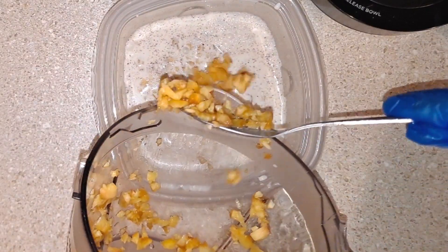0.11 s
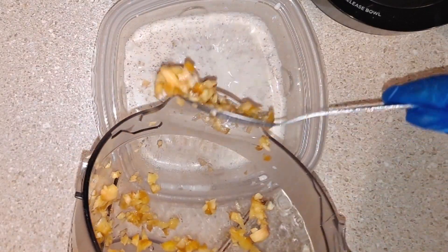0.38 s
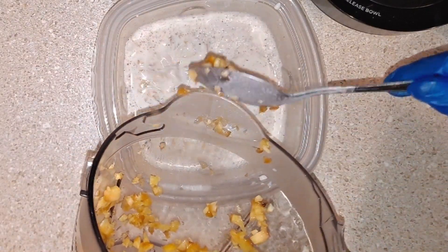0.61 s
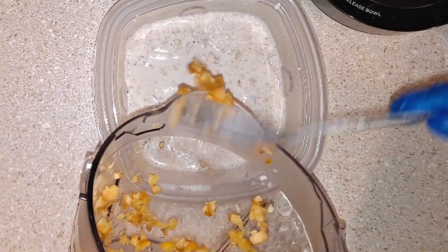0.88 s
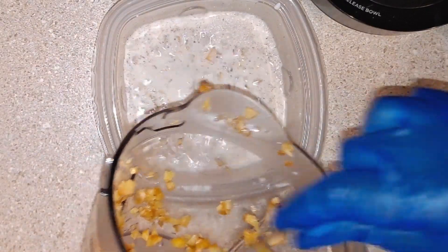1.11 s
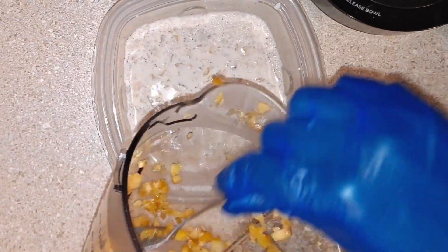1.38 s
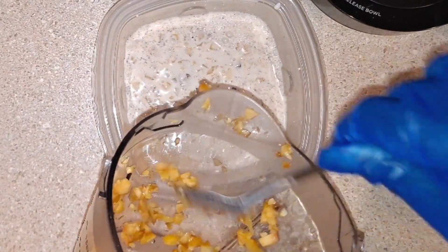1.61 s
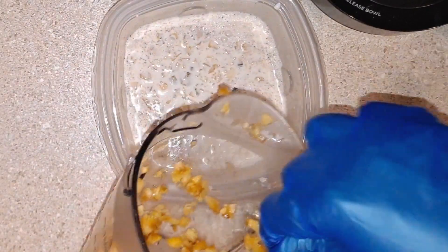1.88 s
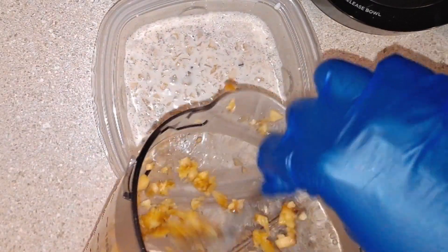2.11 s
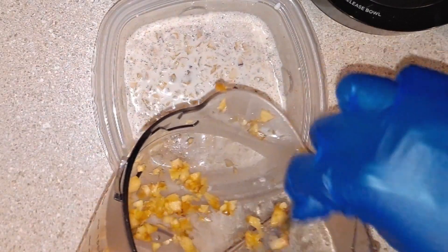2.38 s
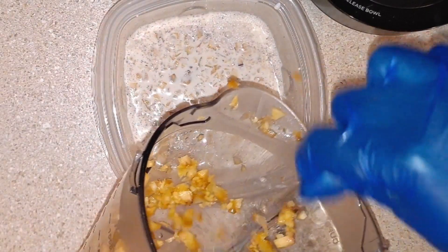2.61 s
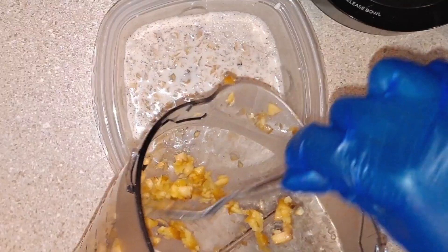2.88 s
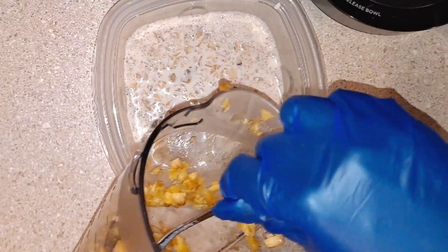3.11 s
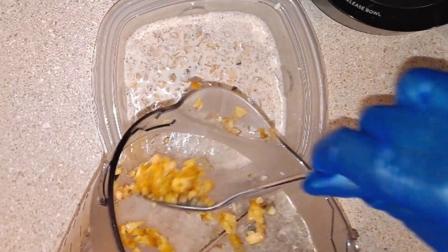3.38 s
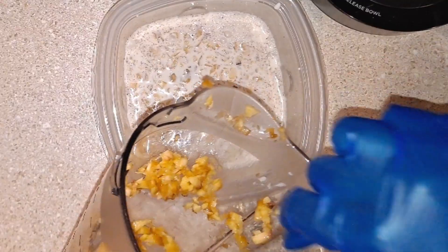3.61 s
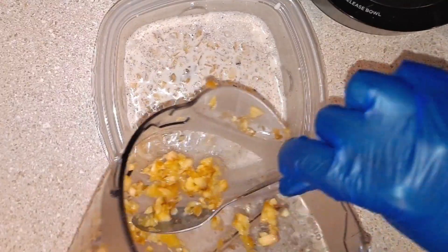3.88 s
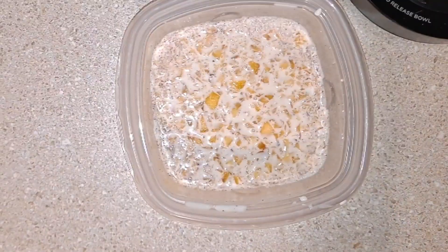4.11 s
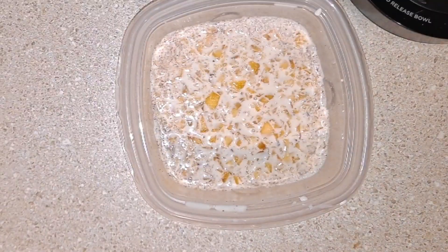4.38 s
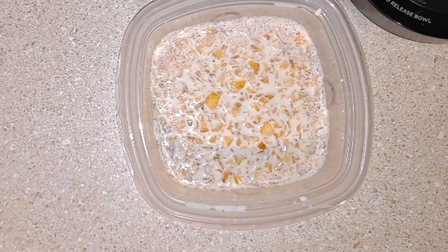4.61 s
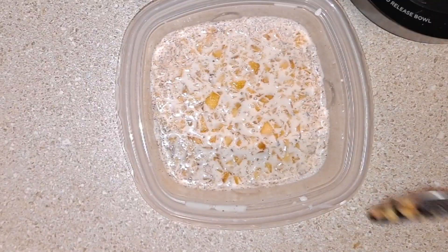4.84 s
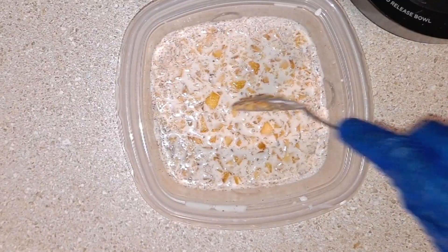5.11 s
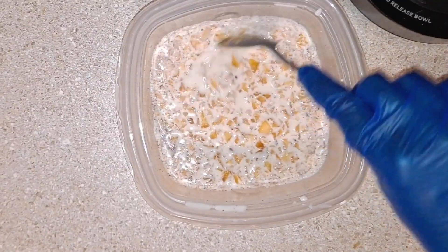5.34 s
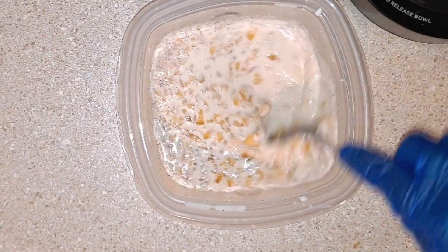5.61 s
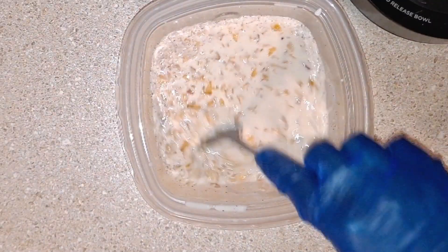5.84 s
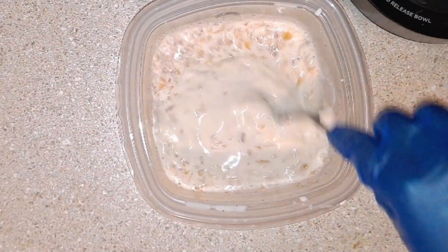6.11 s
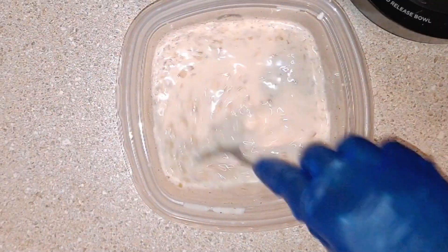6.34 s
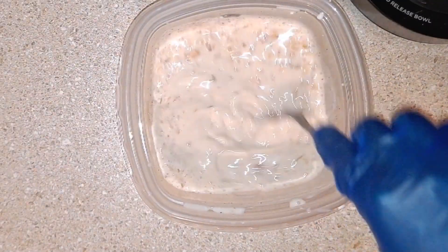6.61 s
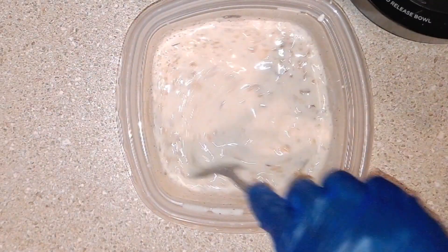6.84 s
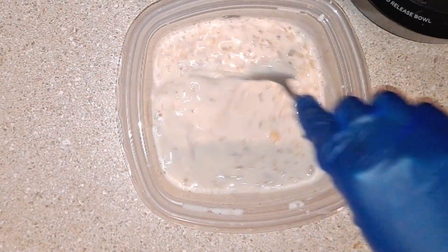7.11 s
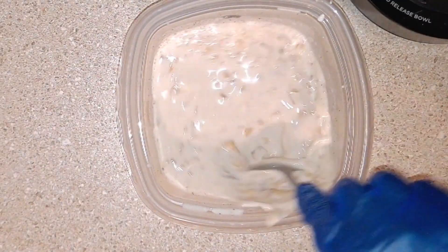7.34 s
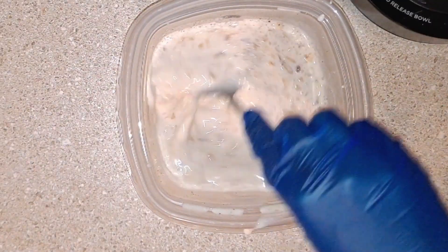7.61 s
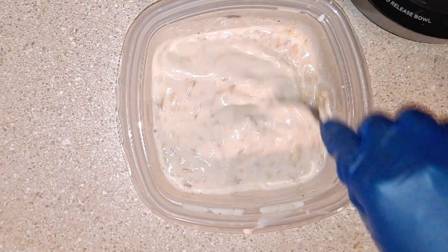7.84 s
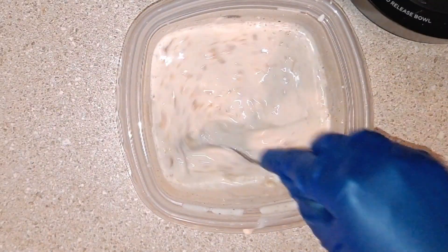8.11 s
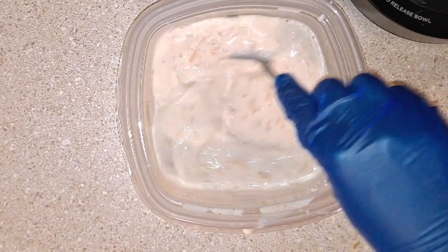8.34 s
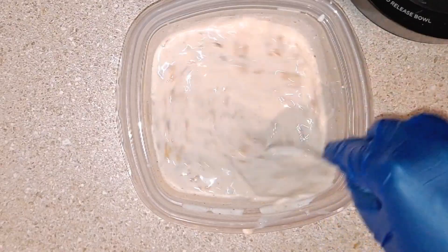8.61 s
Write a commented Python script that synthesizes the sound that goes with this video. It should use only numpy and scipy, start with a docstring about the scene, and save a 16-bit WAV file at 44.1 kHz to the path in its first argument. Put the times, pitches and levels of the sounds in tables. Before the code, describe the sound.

Close in a small hard kitchen, a steel spoon taps lightly in a plastic jar while thin rubber gloves crackle. Loud, bright clacks and gritty scrapes follow in irregular bursts. They cut off abruptly, leaving faint fridge hum, then the spoon stirs thick liquid in a plastic tub with softer hollow knocks, short rubs and small wet pops.

```python
"""A steel spoon knocks and scrapes inside a tilted plastic jar; after a brief silence it stirs a thick
liquid in a plastic tub. Each blow is a chatter of contacts that excites decaying modes of wall and body;
scraping is a dense train of slips through the same modes. Popping air pockets are rising sine bursts.
Gloves rustle as filtered crackle; a fridge hums on the right as wavering tones over shaped noise, and
sparse decaying taps give the echo of a small hard kitchen."""
import sys
import numpy as np
from scipy import signal
from scipy.io import wavfile
from scipy.ndimage import uniform_filter1d

SR = 44100
rng = np.random.default_rng(int(sys.argv[2]) if len(sys.argv) > 2 else 0)


def magnitude_from_level(level_db):
    """Linear magnitude for a level in decibels (20 dB per decade)."""
    exponent = np.asarray(level_db, float) / 20
    return 10 ** exponent


def digitize_waveform(pressure):
    """Quantize a signal to 16-bit integers and store it at the path in sys.argv[1].

    Rows of a 2-D input are taken as channels; values are limited to [-1, 1].
    """
    field = np.atleast_2d(pressure).T
    bounded = np.clip(field, -1, 1)
    quanta = np.round(bounded * 32767).astype(np.int16)
    wavfile.write(sys.argv[1], SR, quanta)


N = 384544  # samples

# blows of the spoon on the tub: t/s, wall level/dB, floor level/dB, favoured f/Hz
TUB_STRIKES = [(5.513, -36.5, -36, 1025), (5.6, -45, -38.5, 732), (5.782, -51.5, -43, 728),
               (6.038, -33.5, -49, 2708), (6.146, -20, -31, 1320), (6.233, -22.5, -26.5, 1060),
               (6.262, -34, -40, 2760), (6.442, -27.5, -29, 895), (6.589, -36, -41, 1085),
               (6.651, -39.5, -42, 1215), (6.772, -30.5, -31, 873), (7.081, -41.5, -34, 857),
               (7.285, -32.5, -35, 1018), (7.366, -25, -39, 2686), (7.619, -35, -36.5, 1076),
               (7.983, -19.5, -42, 3010), (8.008, -27.5, -33, 611), (8.257, -28, -31.5, 1190),
               (8.331, -33.5, -49, 723), (8.375, -27.5, -47, 780), (8.502, -33, -66.5, 2784),
               (8.607, -36.5, -46.5, 786), (8.693, -26, -43, 1005)]
# treble spectrum of a contact or slip: f/Hz, relative level/dB
CONTACT_TREBLE = [(1200, -41.5), (2200, -9.5), (5500, 3.5), (9500, 0.5), (11500, -6.5), (15500, -7.5)]
# stereo balance of the background: f/Hz, left over right level/dB
LEFT_OVER_RIGHT = [(60, -16.5), (200, -8.5), (700, -4.5), (15000, 0.5)]
# left-right correlation of diffuse sound: f/Hz, correlation
LIKENESS = [(60, 0.93), (300, 0.31), (640, 0.27), (1400, 0.016)]
GAP_START, GAP_END = 3.927, 3.946  # s, the brief silence between jar and tub


def evened(x):
    """Normalises to unit root-mean-square."""
    return x / np.sqrt(np.mean(x ** 2) + 1e-20)


def read(points, hz):
    """Interpolates a spectrum linearly on a logarithmic frequency axis."""
    f, value = np.transpose(points)
    return np.interp(np.log(hz + 1), np.log(f + 1), value)


def coloured(x, points):
    """Linear filtering: a short finite impulse response imposes the given spectrum."""
    hz = np.linspace(0, SR / 2, 129)
    taps = signal.firwin2(97, hz, magnitude_from_level(read(points, hz)), fs=SR)
    return signal.oaconvolve(x, taps[None], "same", axes=1)


def pair(size, same):
    """Partial coherence: two Gaussian noises with correlation `same`."""
    a, b = rng.standard_normal((2, size))
    return np.array([a, same * a + np.sqrt(1 - same ** 2) * b])


def add(mix, start_s, sound, db):
    """Superposition: adds a sound in place, with its peak set to db."""
    part = mix[:, round(start_s * SR):][:, :sound.shape[1]]
    part += magnitude_from_level(db) * sound[:, :part.shape[1]] / abs(sound).max()


def stroke_gain(rows):
    """Amplitude envelope of strokes that bite, ease and lift off; bite is the share of length spent rising."""
    t, gain = np.arange(N) / SR, 0
    for start_s, length_s, db, bite in rows:
        corners = start_s + length_s * np.array([0, bite, 0.75, 1.15])
        gain = gain + magnitude_from_level(db) * np.interp(t, corners, [0, 1, 0.7, 0])
    return gain


def strokes(struck, slide, free):
    """Friction follows impact: slides after blows, harder after hard ones, and free strokes that swell in."""
    length_s, full_db, db_per_db = slide
    after_blows = [(row[0], length_s, full_db + db_per_db * row[1], 0.06) for row in struck]
    return after_blows + [(*row, 0.4) for row in free]


def ring(modes, spread_db, sides, split, size, near=None, count=3):
    """Modal response: each mode is a close, uneven cluster of decaying sines; ear phases part with pitch."""
    hz, db, t60 = np.repeat(modes, count, axis=0).T[:, :, None]
    t = np.arange(size) / SR
    up, detune, turn = rng.standard_normal((3, len(hz), 1))
    hz = hz * (1 + split * detune * np.minimum(0.02 / t60, 1))  # long rings sit closer together
    if near:  # the spot that is struck has one strong mode of its own
        hz[-1], db[-1], t60[-1], up[-1] = *near, 0
    fade = magnitude_from_level(db + spread_db * up - 60 * t / t60)
    phase = 2 * np.pi * hz * t
    return np.array([(fade * np.sin(phase + ear * sides * turn * hz / 2000)).sum(0) for ear in (0, 1)])


def air():
    """Stationary noise by spectral shaping: dull appliance noise and microphone hiss, faintly patchy."""
    # background spectrum: f/Hz, relative level/dB
    air_spectrum = [(15, -42), (25, -36.5), (70, -8), (190, -28.5), (354, -20), (641, -31.5), (863, -33.5),
                    (962, -43.5), (9570, -53.5), (16000, -51)]
    frames, hz = N // 512 + 5, np.fft.rfftfreq(2048, 1 / SR)
    a, b, c, d, patches = rng.standard_normal((frames, 1025, 5)).T
    patches = evened(uniform_filter1d(uniform_filter1d(patches, 12, 0), 8, 1))
    same = np.clip(read(LIKENESS, hz), -1, 1)[:, None]
    tilt = magnitude_from_level(read(LEFT_OVER_RIGHT, hz) / 2)[:, None]
    left = a + 1j * b
    right = same * left + np.sqrt(1 - same ** 2) * (c + 1j * d)
    z = np.array([left * tilt, right / tilt])
    z *= magnitude_from_level(read(air_spectrum, hz)[:, None] + 1.4 * patches)
    noise = signal.istft(z, nperseg=2048, noverlap=1536)[1][:, :N]
    return magnitude_from_level(-54.5) * evened(noise)


def fridge():
    """Narrow-band modulation: compressor tones waver by their width, differently at each ear."""
    # compressor lines: f/Hz, level/dB, half width/Hz
    hum_lines = [(59.7, -52, 4.7), (239, -73.5, 2.9), (352, -69.5, 9.9), (487, -73, 4.1)]
    t, out = np.arange(N) / SR, np.zeros((2, N))
    slow_t = np.arange(N // 64 + 1) * 64 / SR
    for hz, db, width in hum_lines:
        f = np.linspace(-width, width, 12)[:, None, None]
        waver = np.exp(2j * np.pi * (f * slow_t + rng.random((12, 2, 1)))).sum(0)
        waver = np.repeat(waver, 64, 1)[:, :N]
        carrier = np.exp(2j * np.pi * (hz * t + rng.random()))
        tone = carrier * (1 + [[0.7], [0.12]] * waver)  # wavers more on the left
        tilt = magnitude_from_level(read(LEFT_OVER_RIGHT, hz) / 2)
        out += magnitude_from_level(db) * tone.real * [[tilt], [1 / tilt]]
    return out


def kitchen(x):
    """Diffuse reverberation: sparse taps of random sign, each band decaying at its own rate."""
    # reverberation time: f/Hz, t60/s
    band_t60 = [(250, 0.45), (660, 0.27), (1740, 0.24), (4590, 0.27), (12100, 0.25)]
    # spectrum of the echo: f/Hz, relative level/dB
    echo_tone = [(300, -3.5), (550, -0.5), (1350, -5), (1750, 3), (8000, -5.5)]
    taps = np.zeros((2, SR // 2))
    at = np.arange(130, SR // 2 - 20, 20)
    at = at + rng.integers(0, 20, (2, len(at)))
    np.put_along_axis(taps, at, rng.choice([-1., 1.], at.shape), 1)
    hz, t, z = signal.stft(taps, SR, nperseg=256)
    same = np.clip(read(LIKENESS, hz), 0, 1)[:, None]  # long waves reach both ears alike
    z[1] = same * z[0] + np.sqrt(1 - same ** 2) * z[1]
    decay_db = read(echo_tone, hz)[:, None] - 60 * t / read(band_t60, hz)[:, None]
    tail = signal.istft(z * magnitude_from_level(decay_db), SR, nperseg=256)[1]
    return signal.oaconvolve(x, tail / np.linalg.norm(tail[0]), axes=1)[:, :N]


def thumps():
    """Structure-borne sound: hard blows shake the counter, which rings in low modes."""
    # blows that shake the counter: t/s, level/dB
    shakes = [(2.468, -26.5), (2.534, -5), (2.819, -14.5)]
    # counter modes: f/Hz, relative level/dB, t60/s
    counter_modes = [(65.4, -8.5, 0.036), (116, -7, 0.018), (229, -6.5, 0.017)]
    out, rise = np.zeros((2, N)), np.minimum(np.arange(6000) / 120, 1)
    for start_s, db in shakes:
        add(out, start_s, ring(counter_modes, 1, 14.0, 0.039, 6000) * rise, db)
    return out * magnitude_from_level([[-6], [3]])  # stronger on the right


def gloves():
    """Crackling noise of thin rubber: fine random impulses while rubbing, and single creases that snap."""
    # creases snapping: t/s, level/dB
    snaps = [(0.1516, -41), (0.1894, -37), (0.234, -36), (0.268, -39), (0.2992, -41), (0.582, -31.5),
             (0.702, -45), (1.017, -43.5), (1.0804, -41)]
    # rubbing: t/s, length/s, level/dB
    rubs = [(0.077, 0.18, -70), (0.179, 0.088, -52.5), (1.013, 0.14, -65.5), (3.969, 0.09, -67.5),
            (4.769, 0.28, -74.5)]
    # rubber spectrum: f/Hz, relative level/dB
    rubber = [(880, -16), (2000, -14), (4500, -9), (11400, -5), (14800, -7), (16500, -18)]
    happens = rng.random(N) < 5000 / SR  # mean rate 5000 per s
    size = magnitude_from_level(2.8 * np.minimum(rng.exponential(1, N), 4)) * happens
    crackle = evened(coloured(pair(N, 0.26) * size, rubber))
    out = crackle * stroke_gain([(*row, 0.06) for row in rubs])
    for start_s, db in snaps:
        snap = pair(1200, 0.28) * np.exp(-np.arange(1200) / 300)
        add(out, start_s, coloured(snap, rubber), db)
    return out


def blip(hz, glide):
    """Bubble resonance: one air pocket gives a few cycles whose pitch rises by 2 * glide per second."""
    t = np.arange(900) / SR
    return np.sin(2 * np.pi * hz * t * (1 + glide * t)) * t * np.exp(-t / 0.0009)


def squelch(rows, count=10):
    """Bubble noise in the thick liquid: small pockets pop at random under the stroke, and large ones."""
    # large air pockets: t/s, level/dB, starting f/Hz
    large_pops = [(6.103, -39, 990), (6.174, -27.5, 940), (6.19, -32, 860), (6.263, -32, 970),
                  (7.381, -31.5, 890), (7.858, -40, 990), (7.884, -41, 1150), (7.906, -39, 1100),
                  (7.92, -31.5, 830), (7.936, -32, 1060), (8.579, -38, 900), (8.59, -34, 860),
                  (8.67, -41.5, 960)]
    small = np.zeros((1, N))
    for pitch, glide in rng.random((count, 2)):
        pops = rng.exponential(1, N) * (rng.random(N) < 300 / SR)  # mean rate 300 per s
        small += signal.oaconvolve(pops, blip(600 + 900 * pitch, 14 * glide))[:N]
    out = magnitude_from_level(-6) * stroke_gain(rows) * evened(small)
    for start_s, db, hz in large_pops:
        add(out, start_s, blip(hz, 4.4)[None], db)
    return out


def scrape(rows, modes, slips_per_s, grain_db, hiss_db):
    """Stick-slip friction: dense uneven slips ring the body at wandering spots, with a dry hiss on top."""
    happens = rng.random(N) < slips_per_s / SR
    size = magnitude_from_level(grain_db * np.minimum(rng.exponential(1, N), 4)) * happens
    bumps = evened(uniform_filter1d(rng.standard_normal(N), 500))  # the pressure of the hand is uneven
    slips = pair(N, 0.55) * size * magnitude_from_level(3.9 * bumps)
    spot = rng.integers(0, 4, N // 1024 + 1).repeat(1024)[:N]
    rung = np.zeros((2, N))
    for k in range(4):
        response = ring(modes, 2.2, 0.61, 0.11, 1700, count=5)
        rung += signal.oaconvolve(slips * (spot == k), response, axes=1)[:, :N]
    hiss = evened(coloured(slips, CONTACT_TREBLE))
    return stroke_gain(rows) * (evened(rung) + magnitude_from_level(hiss_db) * hiss)


def blows(rows, wall, body, tick_db, spot, chatter_s, same, split):
    """Impact excitation: a short chatter of contacts rings wall and body and ticks in the treble."""
    out, t = np.zeros((2, N)), np.arange(1500) / SR
    bounce = np.exp(-t / chatter_s) * np.minimum(t / 0.0018, 1)
    rise = np.minimum(np.arange(4000) / 60, 1)
    stiff = signal.butter(4, 0.79 * wall[0][0] / (SR / 2), "high")  # the wall is weak below its first mode
    for start_s, wall_db, body_db, near_hz in rows:
        contact = pair(1500, same) * bounce * rng.exponential(1, 1500) ** 0.77
        response = ring(wall, 3.0, 0.55, 0.09, 1800, (near_hz, *spot), count=8)
        rung = signal.fftconvolve(contact, response, axes=1)
        add(out, start_s, signal.lfilter(*stiff, rung), wall_db)
        add(out, start_s, ring(body, 8.2, 2.9, split, 4000, count=4) * rise, body_db)
        add(out, start_s, coloured(contact, CONTACT_TREBLE), wall_db + tick_db)
    return out


def spoon_in_tub():
    """Impact and friction on a liquid-loaded shell: tub wall and floor modes, with popping air pockets."""
    # spoon edge dragged apart from the slides after blows: t/s, length/s, level/dB
    drags = [(6.052, 0.075, -44.5), (6.46, 0.092, -46.5), (6.84, 0.054, -53), (7.128, 0.043, -46.5),
             (7.42, 0.063, -54.5), (7.637, 0.07, -45.5), (7.84, 0.13, -48.5), (8.041, 0.095, -61),
             (8.27, 0.0721, -49.5), (8.454, 0.03, -53.5), (8.556, 0.047, -51.5)]
    # floor modes: f/Hz, relative level/dB, t60/s
    floor = [(170.3, -1.2, 0.045), (295, -0.27, 0.048), (396.3, -2.2, 0.081), (512, 1, 0.059)]
    # wall modes: f/Hz, relative level/dB, t60/s
    wall = [(835, -3.5, 0.04), (1046, -18, 0.059), (1121, 5, 0.02), (1643, 7.5, 0.0028), (2733, 4, 0.01),
            (3590, -9, 0.0037), (4756, 2, 0.018)]
    slide = 0.049, -32, 0.72  # length s, dB after a 0 dB blow, dB per dB of blow
    spot = 10, 0.011  # struck mode: relative dB, t60 s
    stirs = strokes(TUB_STRIKES, slide, drags)
    # the liquid dulls the treble tick: 1.5 dB under the wall
    struck = blows(TUB_STRIKES, wall, floor, -1.5, spot, chatter_s=0.0049, same=0.49, split=0.18)
    dragged = scrape(stirs, floor + wall, slips_per_s=5500, grain_db=2.7, hiss_db=-10)
    return (struck + dragged + squelch(stirs)) * magnitude_from_level([[-1.5], [1.5]])  # slightly to the right


def spoon_in_jar():
    """Impact and friction on a thin shell: plastic wall modes and the resonances of the air column."""
    # blows: t/s, wall level/dB, air column level/dB, favoured f/Hz
    strikes = [(0.5109, -26.5, -30.5, 4620), (0.66, -36.5, -34.5, 4160), (0.678, -41, -37, 4150),
               (0.8273, -34, -45, 4470), (1.2318, -1.5, -26.5, 2200), (1.5495, -5.5, -28.5, 5850),
               (1.7971, -6.5, -19.5, 4780), (1.8893, -2, -7.5, 5630), (2.1232, -24.5, -62, 1990),
               (2.1329, -7, -28.5, 2800), (2.1822, -6, -36.5, 2000), (2.3404, -12, -20.5, 3840),
               (2.3789, -6, -16, 3100), (2.4702, -10, -26.5, 3080), (2.5323, -3, -34, 2020),
               (2.691, -9.5, -18.5, 2250), (2.7497, -2.5, -23.5, 3130), (2.766, -14, -32.5, 2780),
               (2.7956, -5.5, -42, 2820), (2.821, -5, -40.5, 1975), (3.0131, -12.5, -22.5, 3600),
               (3.0465, -18.5, -25.5, 2470), (3.1248, -12, -17, 1960), (3.254, -9.5, -33, 3750),
               (3.5396, -14, -22.5, 2180), (3.6086, -4.5, -20, 3170), (3.6456, -12, -13, 4040),
               (3.687, -11.5, -21, 2900), (3.8176, -6.5, -22.5, 2150), (3.829, -7.5, -29, 1995)]
    # spoon edge dragged apart from the slides after blows: t/s, length/s, level/dB
    drags = [(0.645, 0.068, -51.5), (1.382, 0.28, -50.5), (1.505, 0.072, -39), (2.007, 0.12, -47.5),
             (2.149, 0.12, -44), (2.5, 0.045, -34), (3.245, 0.013, -36), (3.315, 0.14, -51.5),
             (3.793, 0.03, -47)]
    # air column modes: f/Hz, relative level/dB, t60/s
    column = [(547, -17.5, 0.065), (1052, -9.5, 0.0078)]
    # wall modes: f/Hz, relative level/dB, t60/s
    wall = [(1746, -11, 0.034), (1963, -10.5, 0.06), (2200, -7.5, 0.03), (2620, -6, 0.012),
            (3150, -5.5, 0.018), (3628, -6.5, 0.037), (4430, 0.5, 0.0069), (5265, 1.5, 0.005)]
    slide = 0.13, -39, 1.648  # length s, dB after a 0 dB blow, dB per dB of blow
    spot = 9, 0.028  # struck mode: relative dB, t60 s
    # the treble tick stands 5.5 dB over the wall
    struck = blows(strikes, wall, column, 5.5, spot, chatter_s=0.0044, same=0.32, split=0.043)
    slides = strokes(strikes, slide, drags)
    dragged = scrape(slides, column[:1] + wall, slips_per_s=5400, grain_db=1.9, hiss_db=0.54)
    no_bass = signal.butter(2, 220 / (SR / 2), "high")  # the jar sounds carry no bass
    return signal.lfilter(*no_bass, struck + dragged) * (np.arange(N) / SR < GAP_START)


def scene():
    """Superposition of direct and reverberant sound: jar, then tub; the gap cuts the last jar echo."""
    t = np.arange(N) / SR
    spoon = spoon_in_jar() + spoon_in_tub()
    spoon[0] = np.roll(spoon[0], 2)  # left lags 2 samples: the spoon hand is nearer the right port
    spoon += gloves()
    tub_started = t > TUB_STRIKES[0][0]
    echo = kitchen(spoon) * np.where(t < GAP_START, magnitude_from_level(-10.0), magnitude_from_level(-5.5) * tub_started)
    heard = uniform_filter1d(1. * ((t < GAP_START) | (t > GAP_END)), 40)
    return (spoon + echo + thumps() + air() + fridge()) * heard


def band_limit(x):
    """A steep low-pass at the top of the band."""
    return signal.sosfilt(signal.butter(12, 15950, fs=SR, output="sos"), x)


def record(dry):
    """Microphone response: a high-pass drops the deepest bass and saturation rounds the hardest peaks."""
    thin = signal.lfilter(*signal.butter(2, 40 / (SR / 2), "high"), dry)
    return band_limit(np.tanh(thin))


dry = scene()
out = record(dry)
digitize_waveform(out)
```